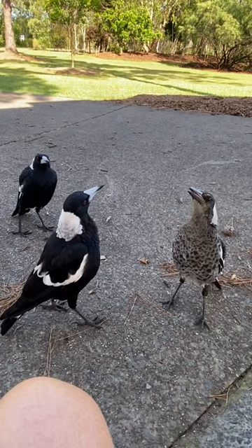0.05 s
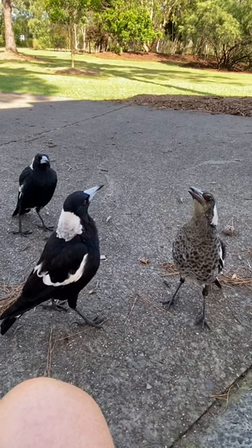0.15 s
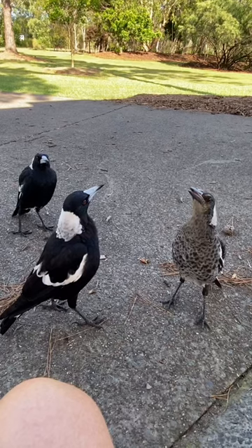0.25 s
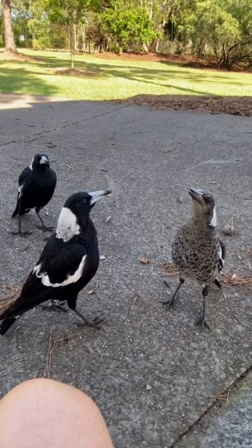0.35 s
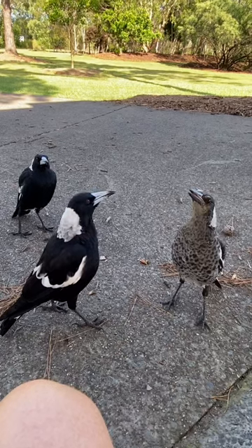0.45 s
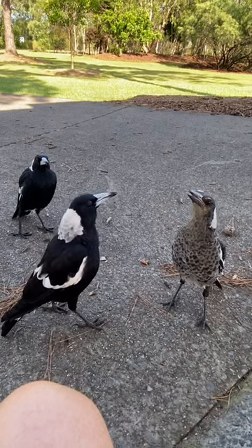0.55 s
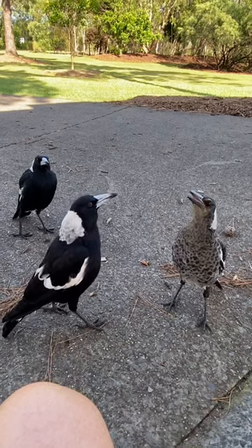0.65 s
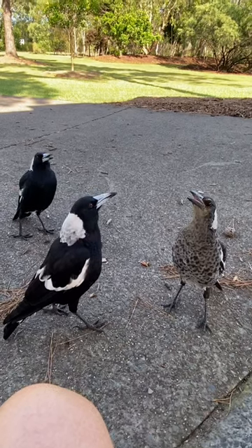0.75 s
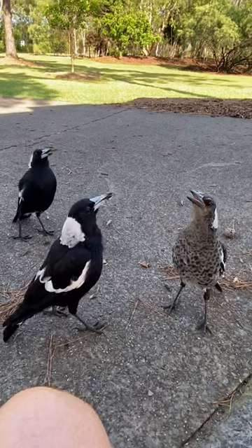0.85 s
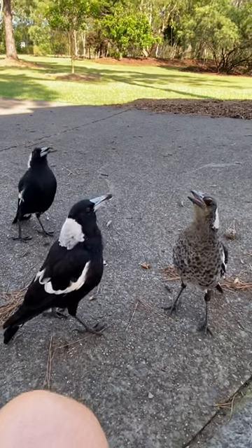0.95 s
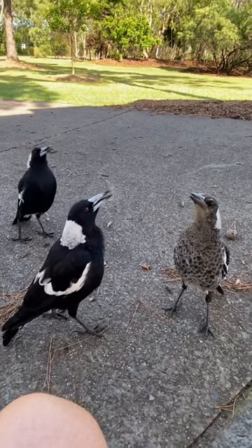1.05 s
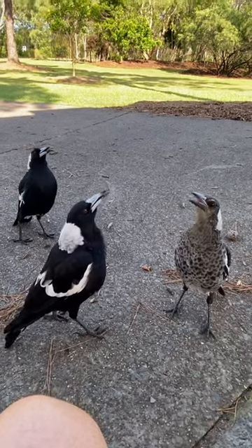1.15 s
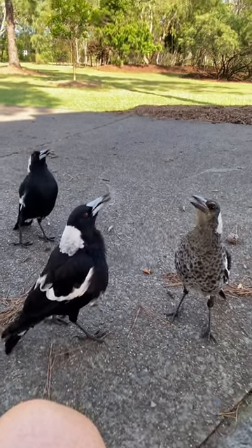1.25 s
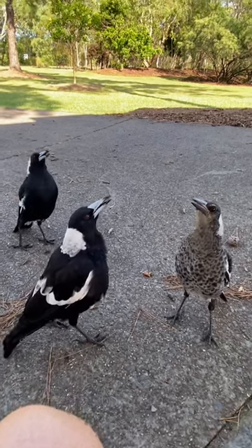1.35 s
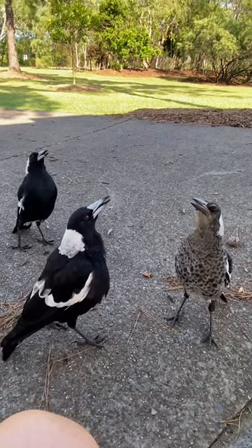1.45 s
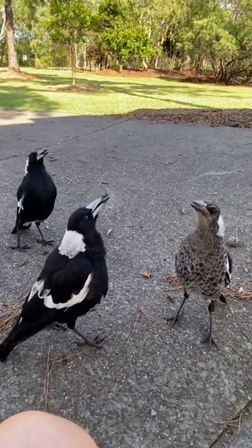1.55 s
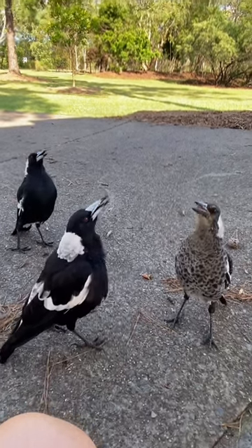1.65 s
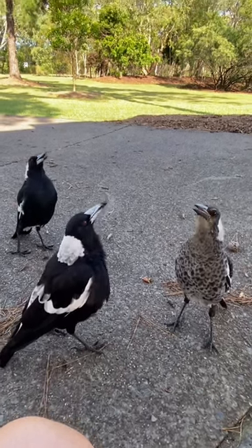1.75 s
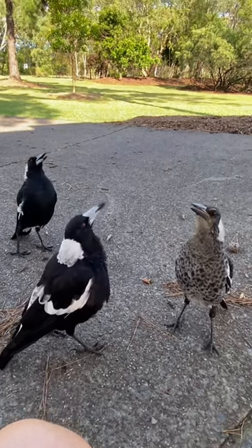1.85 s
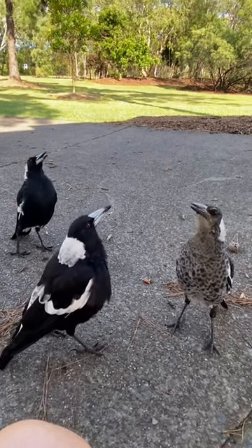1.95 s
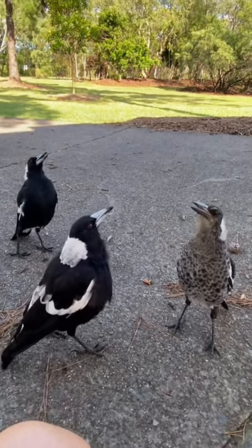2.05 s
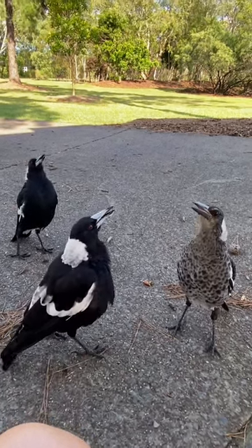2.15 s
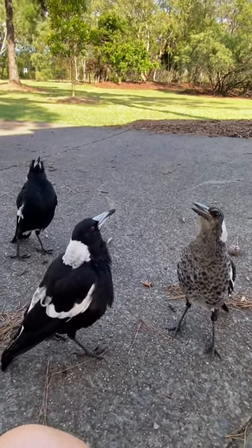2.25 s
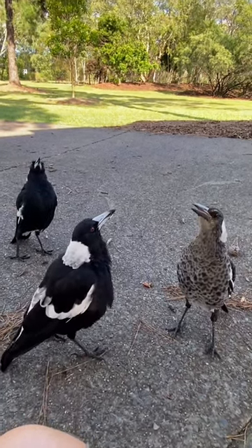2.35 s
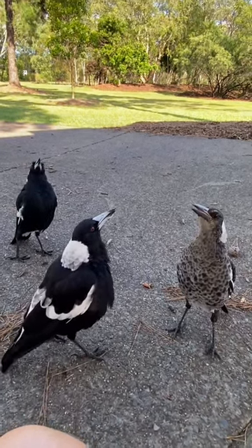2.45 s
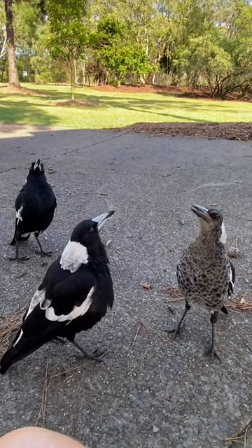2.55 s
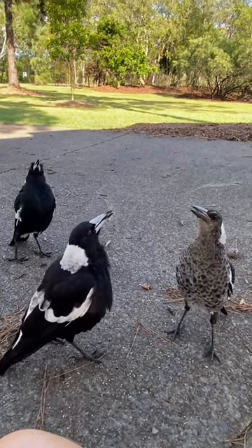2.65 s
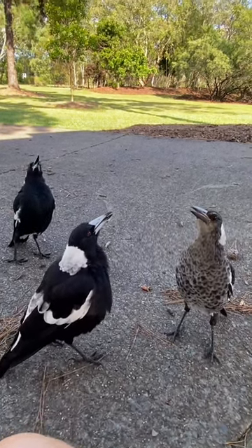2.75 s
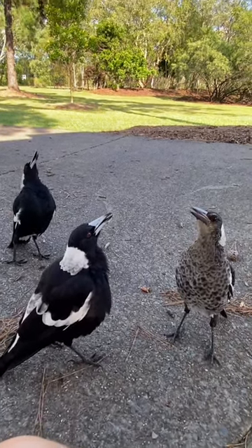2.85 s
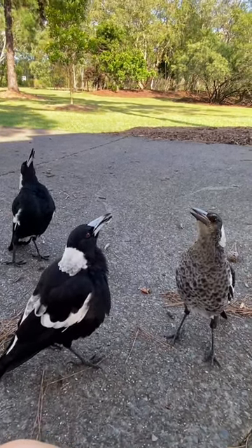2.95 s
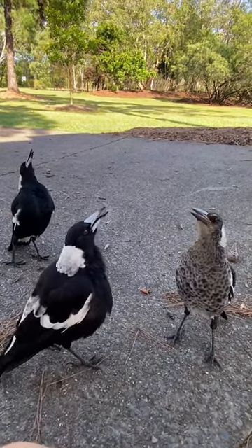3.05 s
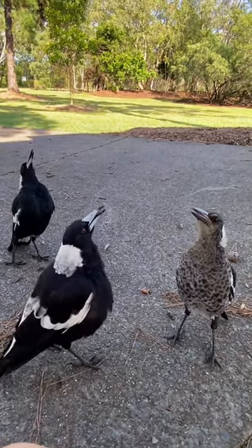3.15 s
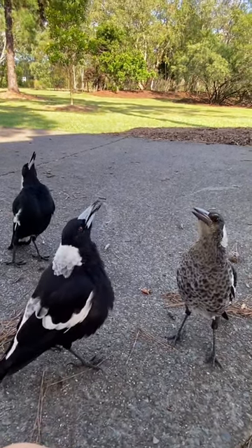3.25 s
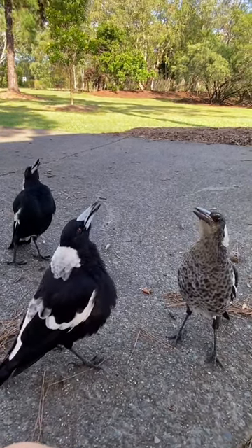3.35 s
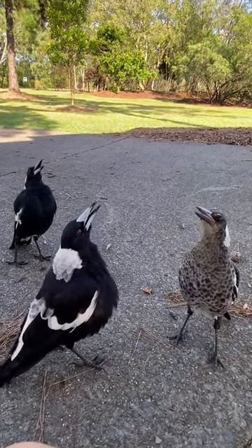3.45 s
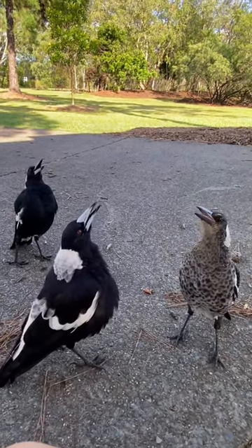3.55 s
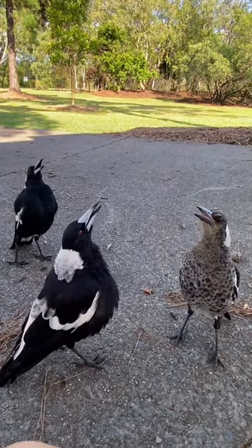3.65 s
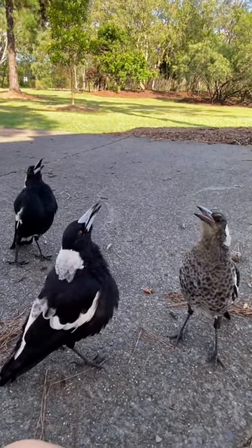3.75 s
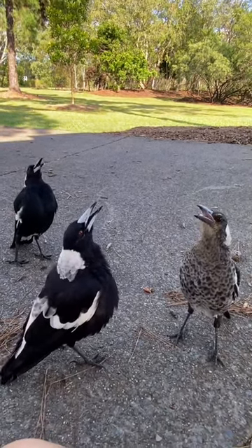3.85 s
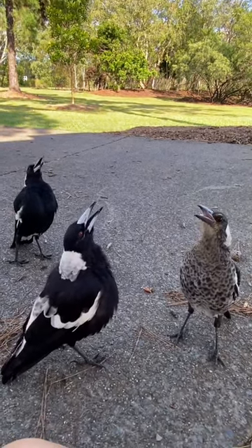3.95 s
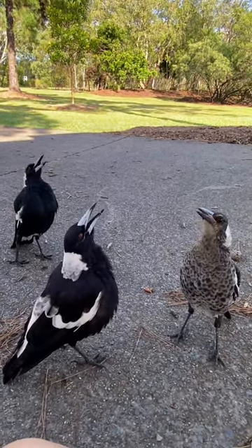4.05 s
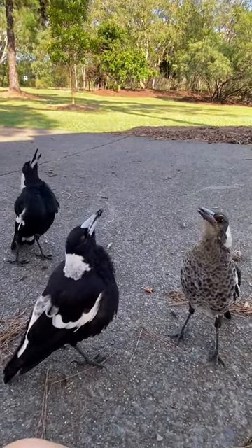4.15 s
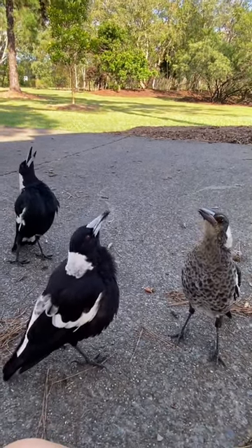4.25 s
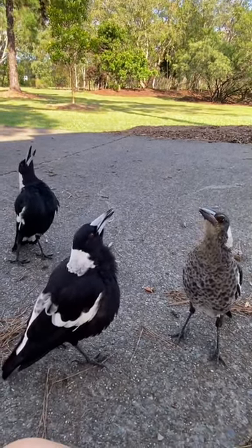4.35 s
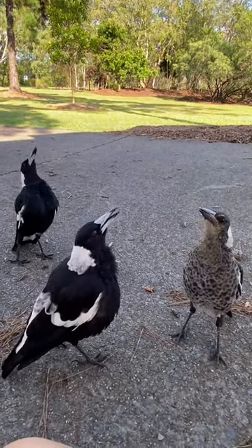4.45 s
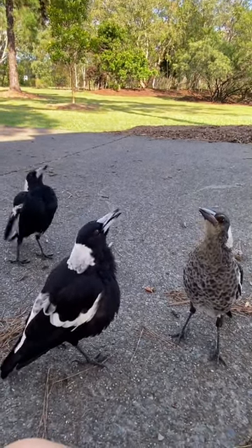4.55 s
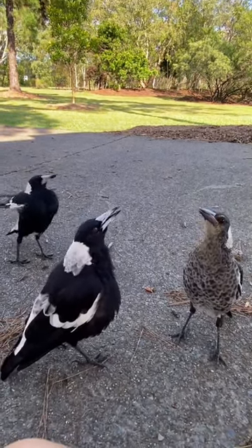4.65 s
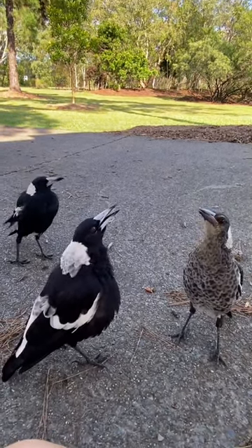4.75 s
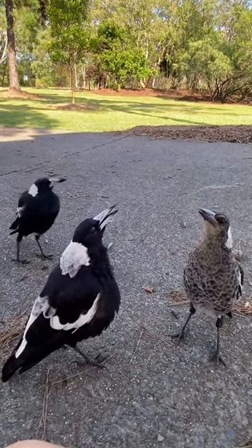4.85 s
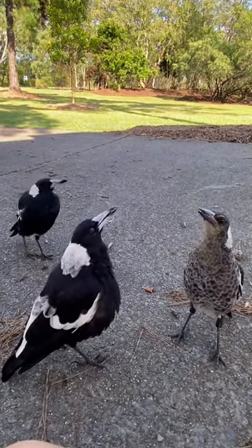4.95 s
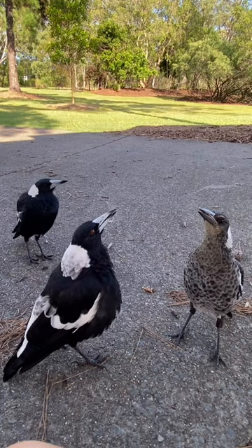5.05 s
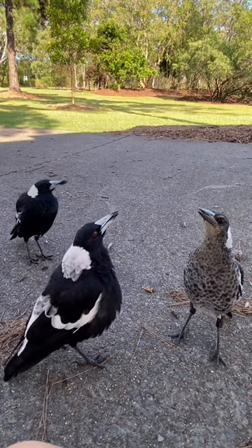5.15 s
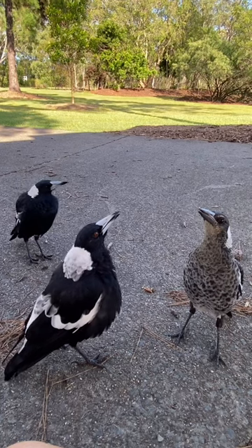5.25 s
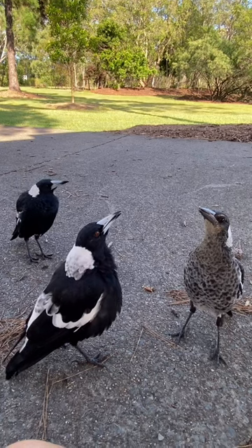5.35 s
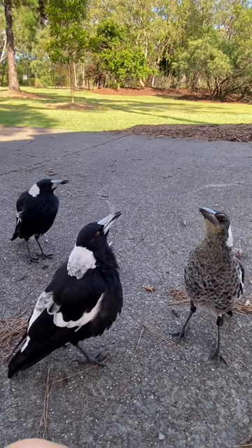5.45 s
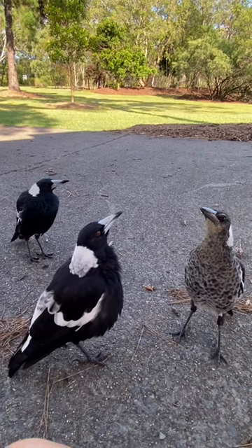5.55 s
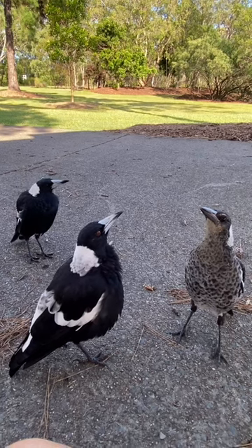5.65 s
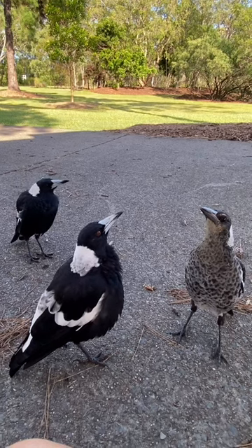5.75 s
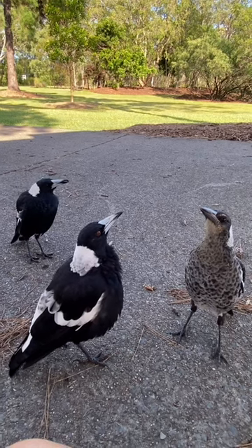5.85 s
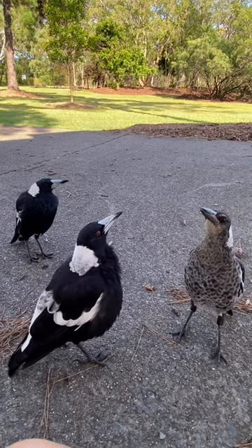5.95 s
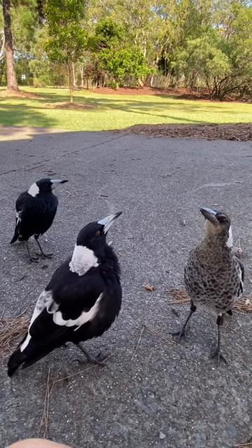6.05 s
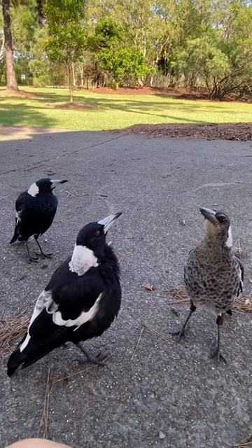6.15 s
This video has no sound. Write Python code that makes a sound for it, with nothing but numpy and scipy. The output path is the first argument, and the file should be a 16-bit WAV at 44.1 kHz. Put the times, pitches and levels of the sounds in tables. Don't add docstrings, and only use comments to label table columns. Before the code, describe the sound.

Loud fluting magpie warbles, gurgling and gliding around a middle pitch, then stopping abruptly to leave faint cicada hiss and one tiny chirp.

```python
import sys
import numpy as np
from scipy import signal
from scipy.fft import rfft, irfft, next_fast_len
from scipy.io import wavfile
from scipy.ndimage import uniform_filter1d

SR = 44100
rng = np.random.default_rng(int(sys.argv[2]) if len(sys.argv) > 2 else 0)


def elevation(decibels):
    levels = np.asarray(decibels, float)
    return 10 ** (levels / 20)


def dump_mix(stems):
    frames = np.atleast_2d(stems).T
    limited = np.clip(frames, -1, 1)
    pcm = np.round(limited * 32767).astype(np.int16)
    wavfile.write(sys.argv[1], SR, pcm)


N = 273420

# time_s, pitch_hz, level_db
CAROL = [
    [(1.12, 1050, -21), (1.15, 1025, -18), (1.17, 994, -11), (1.211, 1005, -12), (1.242, 989, -13.5),
     (1.272, 966, -48)],
    [(1.545, 1159, -24.5), (1.6, 1174, -19.5), (1.66, 1168, -15), (1.687, 1162, -13.5), (1.74, 1159, -14),
     (1.76, 1128, -20)],
    [(1.753, 1167, -15.5), (1.816, 1082, -21), (1.83, 1047, -24.5), (1.844, 1040, -29), (1.87, 1083, -13),
     (1.9, 1022, -26.5)],
    [(3.332, 1139, -30.5), (3.35, 1161, -15), (3.385, 1156, -11), (3.43, 1128, -13), (3.51, 1116, -15.5),
     (3.66, 1081, -17.5), (3.76, 1056, -18.5), (3.82, 1076, -25)],
    [(3.82, 1211, -26.5), (3.872, 1139, -20), (3.905, 1129, -17), (3.978, 1113, -18.5), (4.03, 1104, -27.5),
     (4.05, 1130, -35), (4.08, 1234, -30), (4.11, 1294, -28.5), (4.134, 1292, -35.5)],
    [(4.138, 1470, -24.5), (4.155, 1333, -20.5), (4.19, 1220, -16), (4.3, 1174, -16.5), (4.42, 1160, -19),
     (4.472, 1122, -28)],
    [(4.68, 1149, -38), (4.73, 1174, -32.5), (4.77, 1216, -28), (4.83, 1192, -24.5), (4.885, 1176, -27),
     (4.94, 1130, -41.5)],
    [(4.926, 1017, -40), (5.0, 996, -28.5), (5.07, 977, -20.5), (5.12, 961, -17), (5.15, 936, -15.5),
     (5.19, 927, -15.5), (5.235, 941, -17)],
]
# time_s, pitch_hz, level_db
ANSWER = [
    [(3.8, 1427, -38.5), (3.812, 1534, -33.5), (3.835, 1620, -30.5), (3.865, 1527, -30.5),
     (3.945, 1450, -25.5), (3.975, 1480, -24.5), (4.0, 1417, -21.5), (4.05, 1476, -29), (4.138, 1385, -29)],
    [(5.855, 1345, -55), (5.887, 1433, -43.5), (5.91, 1514, -41), (5.95, 1520, -42)],
    [(4.1, 1002, -32.5), (4.15, 1037, -31.5), (4.178, 1127, -27.5), (4.21, 1086, -30.5), (4.262, 1096, -35)],
    [(1.565, 970, -23), (1.58, 988, -15.5), (1.605, 1026, -17.5), (1.625, 997, -20.5)],
]
# time_s, pitch_hz, level_db
DRONE = [
    [(1.9, 773, -33.5), (1.93, 740, -23.5), (1.98, 700, -22), (2.07, 709, -23.5), (2.105, 685, -25),
     (2.155, 698, -31)],
    [(2.89, 928, -16), (2.945, 883, -15), (2.962, 865, -18.5)],
    [(2.958, 843, -19), (2.99, 830, -18), (3.06, 828, -19), (3.11, 812, -21), (3.18, 809, -25)],
    [(5.228, 932, -21), (5.28, 927, -19), (5.42, 920, -22.5), (5.49, 862, -37.5)],
]
# left_minus_right_db, overtones_db, rasp_db, above_third_overtone_db
VOICE = [(1, -22, -42.5, 0.5), (2.5, -24, -41.5, -4), (1, -27, -44.5, 1), (2.5, -12, -36.5, -12),
         (3.5, -22, -62.5, 7), (2, -22.5, -76, 2), (1.5, -11.5, -27, -9), (-0.5, -26.5, -56.5, -5.5),
         (-2.5, -9.5, -28, -8), (-4.5, -40, -37, -.3), (3.5, -16, -28, -1), (0, -26.5, -34.5, 3),
         (1, -29.5, -40, -16), (3, -15.5, -28, -9), (2.5, -8.5, -37, -8.5), (0.5, -22.5, -43.5, -2.5)]

# start_s, length_s, first_pitch_hz, peak_db, peak_place_0_to_1
MELLOW = [
    (0.688, 0.11, 903, -17.5, 0.35),
    (0.937, 0.086, 774, -18, 0.7),
    (1.777, 0.036, 907, -18.5, 0.55),
    (2.374, 0.049, 769.4, -19, 0.6),
    (2.422, 0.13, 870, -12.5, 0.46),
    (2.625, 0.081, 1338, -31.5, 0.4),
    (4.609, 0.048, 959, -30.5, 0.78),
    (4.632, 0.055, 1056, -31, 0),
]
BRIGHT = [
    (0.801, 0.048, 1327, -21.5, 0.56),
    (1.055, 0.048, 949, -21.5, 0.62),
    (2.873, 0.024, 1366, -15, 0.11),
]
ASIDE = [
    (1.148, 0.041, 1514, -21, .03),
    (4.089, 0.17, 904.5, -32.5, 0.39),
]
CLIMBING = [
    (.535, 0.067, 669, -32, 0.99),
    (.555, 0.06, 836, -29, 0.92),
    (1.5, 0.062, 918.6, -21, 0.75),
    (2.832, 0.031, 977, -32.5, 0.79),
]
SHRILL = [
    (3.269, 0.063, 1353, -21, 0.53),
]
HOARSE = [
    (1.815, 0.033, 1900, -35.5, 0.73),
    (2.7, 0.049, 1950, -44, 0.58),
    (1.085, 0.072, 1850, -29.5, 0.39),
    (1.601, .16, 2277, -42.5, 0.22),
    (3.348, .42, 5920, -38.5, 0.025),
    (4.17, 0.085, 4150, -46, 0.59),
]
# pitch_sag_hz_per_s, left_minus_right_db, overtones_db, rasp_db
MANNER_VOICE = [(234, 1.5, -32, -44.5), (234.5, 1.5, -25.5, -37), (183, -1.5, -30, -28),
                (-700, 0.5, -23, -32), (-400, 2, -5.5, -25.5), (309.5, -0.5, -25, -23.5)]
SCATTER_HZ, CROAK_RATE = (8, 10, 30, 15, 0, 170), 600

# middle_s, length_ms, pitch_hz, peak_db
RISING_BLIPS = [(2.846, 8.4, 1980, -29.5), (1.195, 12, 1544, -27.5), (1.529, 23, 1890, -32.5),
                (.6224, 19, 896, -19), (.6439, 8, 952, -16.5), (.6833, 14, 895, -26),
                (0.864, 17, 1330, -19.5), (1.0543, 14, 1356, -12.5), (1.075, 10, 1326, -17),
                (1.1303, 7.97, 973, -15.5), (1.347, 13, 960, -30.5), (1.3882, 15, 1316, -22.5),
                (1.4048, 3.6, 1180, -17), (1.424, 12.5, 890, -17), (1.4535, 5.23, 982, -16.5),
                (2.2534, 12, 953, -21.5), (2.2744, 19, 913, -18.5), (2.2938, 17, 762, -21.5),
                (2.3264, 5, 1590, -24.5), (2.34, 16, 1344, -21), (2.5674, 21, 867, -35.5),
                (2.5827, 16, 824, -23), (2.7123, 6.7, 1013, -12), (2.7529, 9.9, 818, -20),
                (2.7668, 11, 762, -25), (2.873, 8.7, 1317, -4), (1.675, 12, 1360, -20.5),
                (1.56, 10, 1244, -23.5), (3.829, 24, 1524, -31.5), (3.246, 11, 1210, -28)]
FALLING_BLIPS = [(0.665, 13, 818, -19.5), (0.877, 12.5, 963, -18.5), (0.891, 14, 1162, -17.5),
                 (0.9071, 10, 878, -15.5), (1.035, 12.4, 940, -12.5), (1.1124, 13, 925, -16),
                 (.905, 6.6, 774, -23), (1.3617, 7.3, 860, -20.5), (1.377, 10, 1130, -21),
                 (1.3931, 14, 830, -30), (1.412, 4.5, 960, -14.5), (1.4349, 4.6, 880, -14),
                 (1.4444, 12, 997, -18), (1.648, 16, 1490, -27.5), (4.04, 30, 1401, -27.5),
                 (1.8474, 13, 1386, -29.5), (2.313, 14, 1163, -19), (2.328, 5.9, 810, -26.5),
                 (2.35, 12.5, 944, -24), (2.365, 16, 1145, -18.5), (2.6085, 17, 760, -20.5),
                 (2.726, 11.2, 976, -10), (2.7406, 10.4, 893, -13), (2.863, 8.5, 1454, -12),
                 (3.207, 34.4, 995, -15), (3.2243, 19.3, 968, -8.5), (3.24, 9, 1050, -10.5),
                 (3.25, 9.9, 800, -18), (3.254, 23, 1110, -15)]

# first_beat_s, then rates_hz spread evenly to the end of the note
THROB = [(0.693, 61, 66.6), (0.8133, 111, 113), (1, 45, 42), (1.543, 74, 87.2), (1.9007, 85, 62, 67, 60),
         (2.4346, 100.7, 92), (2.6254, 83, 96), (2.8977, 95, 93), (2.9712, 78, 71.5, 65, 57),
         (3.336, 85, 79, 89, 84.5), (4.682, 60, 59, 58, 84), (4.9477, 95, 85, 98, 80),
         (5.2433, 92, 82, 57, 59)]
BEAT_SHAPE = [(0.085, -0.052, -0.021, 0.37, -0.74), (-0.28, 0.19, .01, -0.3, -0.56),
              (1, -0.37, -0.065, 0.36, -0.33), (0.016, 0.41, -0.058, 0.19, -0.09),
              (0.24, -0.11, -0.23, 0.26, -0.81), (0.41, -0.22, -0.14, -0.083, 0.28),
              (0.3, 0.63, .01, -0.26, -0.2), (.51, .01, 0.14, -.26, 0.72), (.9, -0.33, .01, 0.41, -0.54),
              (.9, .11, -.35, 0.15, .03), (.85, .4, -.9, 0.35, .35), (0.12, 0.15, .01, -0.09, -0.16),
              (0.63, -0.11, -0.063, 0.25, -0.5)]
UNEVENNESS = [1.1, 1.5, 1.1, 4, 1.2, 1.1, 1.1, .6, .45, .3, .6, .6, .4]
OVERTONE_LIFT = [0, 0, 0, 0, 0, 0, 0, 0, 0, 1, 1, 0, 0]
OVERTONE_SWEEP = [(.4, 1.4, 1), (.4, 1.7, 0.22), (.4, 1.4, 0.39), (0.47, 1.8, 0.13), (.6, 1.2, 0.025),
                  (0.76, 1, 0.5), (.4, 1.4, 0.24), (.8, 2.5, -1.174), (.5, 2.36, -0.49), (0.93, 1.3, 0.11),
                  (1.1, 1.4, 0.16), (0.34, 2.3, -0.22), (0.6, 1.8, 0.23)]
DUET_ORDERS = ((1, 1), (1, 2), (2, 1))

# frequency_hz, level_db
BEAK_COLOUR = [(1200, 5), (1700, -0.5), (2400, -4.5), (3000, -11.5), (3800, -7), (4700, -10), (6000, -21),
               (7400, -45), (8800, -52.5)]
# frequency_hz, level_db
RASP_COLOUR = [(500, -39.5), (1100, 18), (1900, -11), (2600, 0), (3100, -9.5), (4000, -4), (6500, -9),
               (7500, -41.5), (8700, 0.5), (10500, -42), (13000, -15), (14300, -22), (15500, -29.5)]
# start_s, length_s
TREBLE_HISS = [
    (1.53, .09),
    (1.72, .15),
    (2.87, .33),
    (3.2, .07),
    (3.86, .13),
    (4.14, .15),
    (5.1, .2),
]
TREBLE_HISS_DB = [-55, -57.5, -37.5, -49.5, -53.5, -48, -55.5]
# frequency_hz, level_db_per_hz
TREBLE_HISS_COLOUR = [(8800, -33.5), (10000, -6.5), (12800, 2.5), (14500, -8), (15600, -33.5)]

# frequency_hz, left_minus_right_db
PORT_TILT = [(1500, 1.9), (2400, -4), (9000, -6)]
# frequency_hz, left_lead_radians
PORT_LEAD = [(600, -0.22), (1300, -0.48), (2200, 0.24)]
# delay_s, level_db
TRUNK_ECHOES = [(.021, -36), (.047, -37), (.066, -38)]
# frequency_hz, level_db
TREBLE_COPY = [(7900, -56.5), (8600, -40.5), (9900, -17.5), (11100, -13), (12500, -19.5), (14300, -25),
               (15500, -42)]

# frequency_hz, level_db_per_hz
PARK_MID = [(20, -31), (45, -9), (77, -3.5), (300, -19), (2150, -30), (3000, -43.5), (4000, -33.5),
            (4700, -15), (6700, -16), (7100, -21.5), (7700, -33), (8300, -26), (10100, -46), (10800, -85),
            (12300, -34), (14200, -42), (15000, -76.5)]
PARK_SIDE = [(30, -17.5), (90, -31), (260, -28.5), (850, -14.5), (4000, -29), (4650, -8), (6900, 1.5),
             (7800, -7.5), (8100, -26.5), (10300, -42.5), (10900, -75.5), (12400, -25), (14800, -31.5),
             (15800, -53.5)]
# frequency_hz, width_hz, level_db
ENGINE_HUM = [(67.2, 4.2, -43.5), (90.6, 9.2, -37.5), (126.8, 4.6, -41)]
# time_s, level_db
GAIN_CONTROL = [(.14, -35), (1.1, -34.5), (1.25, -39), (1.7, -36), (1.9, -39), (2.4, -36), (2.9, -37.5),
                (3.351, -36.5), (3.472, -42.5), (4.3, -46.5), (4.55, -49), (5.199, -46), (5.799, -45),
                (6.2, -41)]

# frequency_hz, margin_db
GATE_MARGIN = [(1700, 19.5), (2300, 11), (3000, 8.5), (4200, 4.5), (5500, 4.5), (7200, -0.5), (8800, 15),
               (10800, -1), (13000, 4.5), (14600, -0.5)]
# start_s, length_s, pitch_hz, level_db
WHISTLES = [(1.1, .1, 15676, -68), (1.15, .35, 13609, -73), (1.6, .09, 15676, -63), (1.6, .09, 14643, -65),
            (2.48, .07, 15676, -66), (2.48, .07, 14643, -65), (2.93, .09, 15676, -59),
            (2.93, .1, 14643, -58), (3.07, .12, 14643, -58), (3.33, .07, 14643, -69),
            (3.36, .63, 12575, -63), (3.8, .3, 14643, -70), (4.13, .37, 14643, -80),
            (5.03, .22, 14643, -74)]

PITCH_JITTER_HZ, LEVEL_JITTER_DB, BEAT_JITTER_RAD = 2, .3, .12
WOBBLE_S, WOBBLE_HZ, WOBBLE_DB = 3.8, 14, 1.8
BLIP_PAN_DB, BLIP_OVERTONE_DB, BLIP_RASP_DB = 1.5, -28.5, -38
RISE_HZ, FALL_HZ = 120, 80
ATTACK_S, ONSET_DB, FADE_DB_PER_S, RELEASE_S, RELEASE_DB = 0.073, 14, 20, 0.081, 9.5
STILL_S, STILL_FADE_S = 5.155, 0.04
DUET_S, DUET_LENGTH_S, DUET_DB = 4.0, 0.11, -42
ODD_DB = 7
GLIDE_FRAY_S = 1e-4
TAIL_DB, TAIL_T60_S = -20, 0.2
PARK_DB, PARK_SIDE_DB = -34.5, -33.5
LULL_S, LULL_DB, LULL_BACK_S = 3.42, -8, .45
COPY_SHIFT_HZ = 7580
GATE_HZ, GATE_DEPTH_DB, GATE_WHIM_DB = 1600, -40, 1.5
START_S = .137


def table(points, hz):
    f, db = np.transpose(points)
    return np.interp(np.log(np.maximum(hz, 1)), np.log(f), db)


def colour(x, points):
    n = next_fast_len(N)
    hz = np.arange(n // 2 + 1) * SR / n
    return irfft(rfft(x, n) * elevation(table(points, hz)), n)[..., :N]


def unit(x):
    return x / np.sqrt(np.mean(x ** 2))


def walk(rate):
    k = int(SR / rate)
    steps = np.repeat(rng.standard_normal(N // k + 1), k)
    return unit(uniform_filter1d(uniform_filter1d(steps, k), k)[:N])


def add(out, i, x, pan_db):
    out[:, i:i + len(x)] += x * elevation(np.array([[pan_db], [-pan_db]]) / 2)


def magpies():
    tones, breath = np.zeros((2, N)), np.zeros((2, N))
    held_notes(tones, breath)
    gurgle(tones, breath)
    air = rng.standard_normal(N) + 0.68 * rng.standard_normal((2, N))
    return tones + colour(uniform_filter1d(breath, size=300) * air, RASP_COLOUR) * elevation(14.0)


def held_notes(tones, breath):
    waver = PITCH_JITTER_HZ * walk(60)
    tremble = elevation(LEVEL_JITTER_DB * walk(90))
    slip = BEAT_JITTER_RAD * walk(37)
    croak = walk(CROAK_RATE)
    fray = walk(250)
    shake = walk(70)
    phase = np.zeros(N)
    notes = sorted(song(), key=lambda note: note[0][0][0])
    starts = np.array([note[0][0][0] for note in notes])
    throbbing = [np.argmin(abs(starts - row[0])) for row in THROB]
    for k, (note, (pan_db, overtone_db, rasp_db, dull_db, scatter_hz)) in enumerate(notes):
        s, hz, db = np.transpose(sorted(note))
        i = np.arange(int(s[0] * SR), int(s[-1] * SR))
        t = i / SR
        flutter, late, odd_db = np.ones(len(i)), 1, 0
        glide = np.interp(t, (s[1:] + s[:-1]) / 2, abs(np.diff(hz) / np.diff(s)))
        lift = (0.055 + GLIDE_FRAY_S * glide) * fray[i]
        if k in throbbing:
            flutter, late, lift, odd_db = throb(throbbing.index(k), t, s, shake[i], slip[i], fray[i])
        edge = np.clip(np.minimum(t - s[0], s[-1] - t) / 0.0046, 0, 1)
        size = np.sqrt(2) * np.interp(t, s, elevation(db / 2)) ** 2 * edge * tremble[i]
        hz = np.interp(t, s, hz) + waver[i] + scatter_hz * croak[i]
        start = phase[i[0]]
        if abs(s[0] - WOBBLE_S) < .015:
            hz = hz + WOBBLE_HZ * shake[i]
            size = size * elevation(WOBBLE_DB * fray[i])
            lift = .22 * fray[i]
        other = phase[i]
        phase[i] = start + 2 * np.pi * np.cumsum(hz) / SR
        tone, loud = syrinx(hz, start, size, flutter, late, lift, overtone_db, odd_db, dull_db)
        if s[0] < DUET_S < s[-1] and start:
            both = np.sin(np.pi * np.clip((t - DUET_S) / DUET_LENGTH_S, 0, 1)) ** 0.79 * elevation(DUET_DB)
            tone = tone + both * sum(np.sin(a * other + b * phase[i]) / np.sqrt(b) for a, b in DUET_ORDERS)
        add(tones, i[0], tone, pan_db)
        add(breath, i[0], loud * elevation(rasp_db), pan_db)


def throb(which, t, s, shake, slip, fray):
    first, *rates = THROB[which]
    up, down, twice, lean, fall = BEAT_SHAPE[which]
    sweep, lag, favour = OVERTONE_SWEEP[which]
    uneven = UNEVENNESS[which]
    up = up * elevation(uneven * shake)
    down = down * elevation(-uneven * shake)
    if s[0] < STILL_S < s[-1]:
        still = np.clip((STILL_S - t) / STILL_FADE_S, 0, 1)
        up, down, twice = up * still, down * still, twice * still
        lean, fall, sweep, favour = lean * still, fall * still, sweep * still, favour * still
    beats = np.cumsum(np.interp(t, np.linspace(first, s[-1], len(rates)), rates)) / SR
    angle = 2 * np.pi * (beats - np.interp(first, t, beats)) + uneven * slip
    turn = np.exp(1j * angle)
    flutter = 1 + up * turn + down / turn + twice * turn ** 2
    flutter = flutter * np.exp(lean * turn.imag + 1j * fall * turn.real)
    lift = OVERTONE_LIFT[which] * angle + sweep * np.sin(angle - lag) + 0.15 * np.sqrt(uneven) * fray
    late = np.exp((favour * np.cos(angle - lag) - abs(favour)) / 2)
    return flutter, late, lift, ODD_DB * np.minimum(up, 1)


def syrinx(hz, start, size, flutter, late, lift, overtone_db, odd_db=0, dull_db=0):
    phase = start + 2 * np.pi * np.cumsum(hz) / SR
    beat = abs(flutter) / np.sqrt(np.mean(abs(flutter) ** 2))
    tone = np.sin(phase + np.angle(flutter))
    push = (size / size.max()) ** 0.49
    for k in range(2, 14):
        db = overtone_db + (k % 2 - 1.5) * odd_db + (k > 3) * dull_db + table(BEAK_COLOUR, k * hz)
        level = elevation(db) * (k * hz < .4 * SR) * push * late ** min(k - 1, 2)
        tone = tone + level * np.sin(k * (phase + lift) + k * k)
    return size * beat * tone, size * beat ** 0.073


def song():
    notes = [(note, (*voice, 0)) for note, voice in zip(CAROL + ANSWER + DRONE, VOICE)]
    manners = (MELLOW, BRIGHT, ASIDE, CLIMBING, SHRILL, HOARSE)
    for rows, (sag, *voice), scatter_hz in zip(manners, MANNER_VOICE, SCATTER_HZ):
        notes += [(shaped(*row, sag), (*voice, 0, scatter_hz)) for row in rows]
    return notes


def shaped(start, length, hz, db, place, sag):
    rise = length * np.clip(place, .02, .98)
    rest = length - rise
    hold = max(rest - RELEASE_S, 0.63 * rest)
    held_db = db - FADE_DB_PER_S * hold
    first_db = db - ONSET_DB * min(rise / ATTACK_S, 1)
    last_db = held_db - RELEASE_DB * min(rest / RELEASE_S, 1)
    u = np.array([0, rise, rise + hold, length])
    return list(zip(start + u, hz - sag * u, [first_db, db, held_db, last_db]))


def gurgle(tones, breath):
    blips = [(*b, RISE_HZ) for b in RISING_BLIPS] + [(*b, -FALL_HZ) for b in FALLING_BLIPS]
    for s, ms, hz, db, slide_hz in blips:
        u = np.linspace(-1, 1, int(2 * ms * SR / 1000))
        size = elevation(db) * np.cos(np.pi * u / 2) ** 2
        tone, loud = syrinx(hz + slide_hz * u, 0, size, np.ones(len(u)), 0.75, 0, BLIP_OVERTONE_DB)
        i = int(s * SR) - len(u) // 2
        add(tones, i, tone, BLIP_PAN_DB)
        add(breath, i, loud * elevation(BLIP_RASP_DB), BLIP_PAN_DB)


def treble_hiss():
    size = 0
    for (s, length), db in zip(TREBLE_HISS, TREBLE_HISS_DB):
        u = (np.arange(N) / SR - s) / length
        size = size + np.clip(u / .08, 0, 1) * np.clip((1 - u) / 0.43, 0, 1) * elevation(db)
    air = rng.standard_normal(N) + 0.55 * rng.standard_normal((2, N))
    return size * elevation(3.3 * walk(64)) * unit(colour(air, TREBLE_HISS_COLOUR))


def ports(x):
    n = next_fast_len(N)
    hz = np.arange(n // 2 + 1) * SR / n
    half = elevation(table(PORT_TILT, hz) / 2) * np.exp(.5j * table(PORT_LEAD, hz))
    return irfft(rfft(x, n) * np.array([half, 1 / half]), n)[:, :N]


def raised_treble(x):
    n = next_fast_len(N)
    moved = np.roll(rfft(x, n), round(COPY_SHIFT_HZ * n / SR), axis=1)
    return colour(irfft(moved, n)[:, :N], TREBLE_COPY)


def whistles():
    out = np.zeros((2, N))
    for s, length, hz, db in WHISTLES:
        t = np.arange(int(length * SR)) / SR
        edge = np.clip(np.minimum(t, length - t) / .012, 0, 1)
        add(out, int(s * SR), np.sqrt(2) * elevation(db) * edge * np.sin(2 * np.pi * hz * t), 0)
    return out


def trees(x):
    t = np.arange(int(.4 * SR)) / SR
    tail = rng.standard_normal((2, len(t))) * np.exp(-np.log(1000) * t / TAIL_T60_S)
    reply = unit(tail) * elevation(TAIL_DB) / np.sqrt(len(t))
    for s, db in TRUNK_ECHOES:
        reply[:, int(s * SR)] += elevation(db)
    return signal.fftconvolve(x, reply, axes=1)[:, :N]


def park():
    s, gain_db = np.transpose(GAIN_CONTROL)
    t = np.arange(N) / SR
    mid = unit(colour(rng.standard_normal(N), PARK_MID)) * elevation(PARK_DB)
    side = unit(colour(rng.standard_normal(N), PARK_SIDE)) * elevation(PARK_SIDE_DB)
    for hz, width, db in ENGINE_HUM:
        strength = elevation(db) * (1 + 0.46 * walk(width))
        mid = mid + strength * np.sin(2 * np.pi * np.cumsum(hz + 0.195 * width * walk(3.5)) / SR)
    both = np.array([mid + side, mid - side])
    low = signal.sosfiltfilt(signal.butter(2, 2500, fs=SR, output="sos"), both)
    chorus = (both - low) * elevation(0.52 * walk(300) + 1.1 * walk(20))
    back = np.exp(-np.maximum(t - LULL_S, 0) / LULL_BACK_S)
    lull_db = LULL_DB * np.clip((t - LULL_S) / 0.055, 0, 1) * back
    return (low * elevation(lull_db) + chorus) * elevation(np.interp(t, s, gain_db) - gain_db[0])


def gate(x):
    wide, frame = 8, 2048
    mid_side = np.array([x[0] + x[1], x[0] - x[1]]) / 2
    hz, _, z = signal.stft(mid_side, SR, "cosine", frame, frame // 2)
    bins = (abs(z[:, 1:]) ** 2).reshape(2, frame // 2 // wide, wide, z.shape[2])
    power = bins.mean(axis=2) + 1e-18
    around = uniform_filter1d(power ** .25, size=15, axis=1) ** 4
    whim = uniform_filter1d(rng.standard_normal(power.shape), size=4, axis=2) * 2
    band_hz = hz[1::wide, None]
    margin_db = table(GATE_MARGIN, band_hz) + GATE_WHIM_DB * whim
    shut = np.clip(-(10 * np.log10(power / around) + margin_db), 0, 1) * (band_hz > GATE_HZ)
    z[:, 1:] *= np.repeat(elevation(GATE_DEPTH_DB * shut), wide, axis=1)
    mid, side = signal.istft(z, SR, "cosine", frame, frame // 2)[1][:, :N]
    return np.array([mid + side, mid - side])


def scene():
    birds = ports(magpies())
    return birds + trees(birds) + raised_treble(birds) + park() + treble_hiss()


def band_limit(x):
    return signal.sosfilt(signal.butter(12, 15900, fs=SR, output="sos"), x)


def record(dry):
    opened = np.arange(N) > START_S * SR
    mix = (gate(dry) + whistles()) * opened
    return band_limit(mix)


dry = scene()
out = record(dry)
dump_mix(out)
```